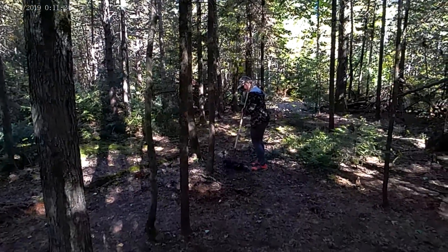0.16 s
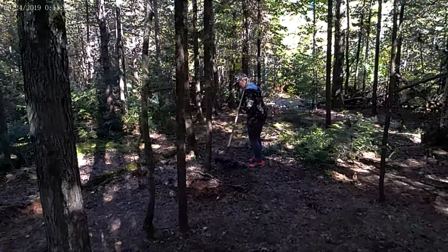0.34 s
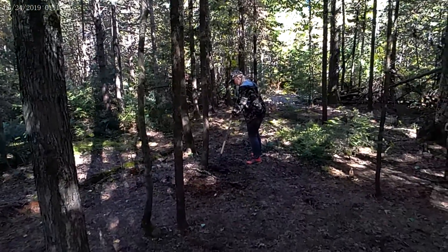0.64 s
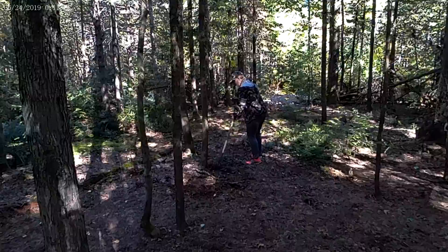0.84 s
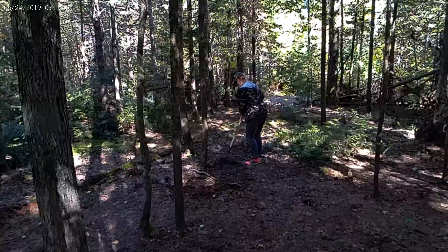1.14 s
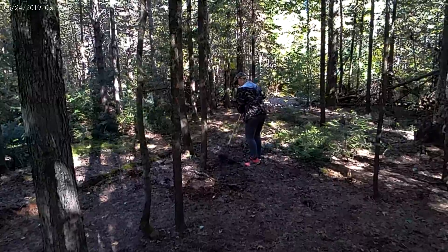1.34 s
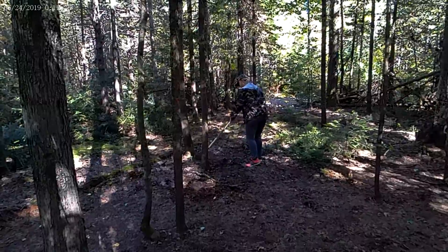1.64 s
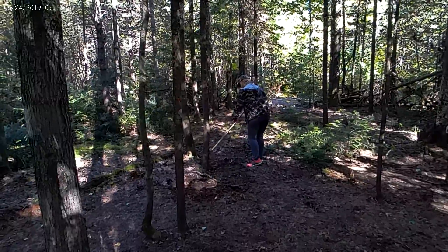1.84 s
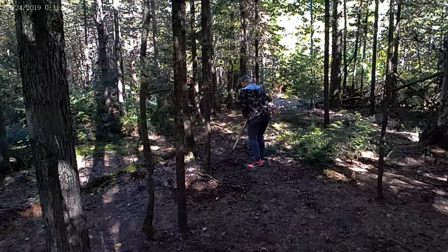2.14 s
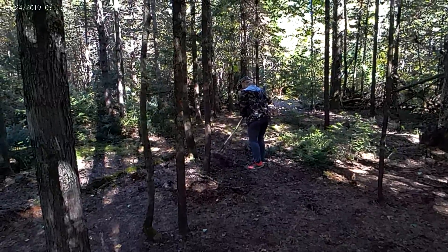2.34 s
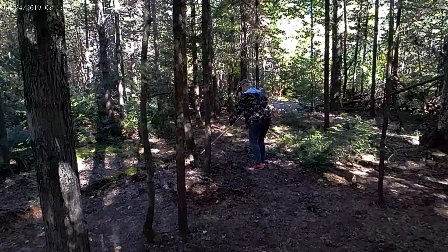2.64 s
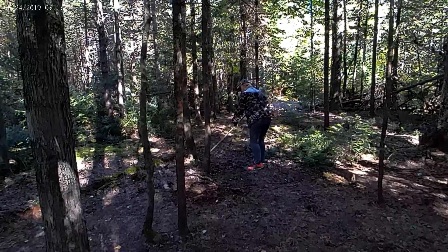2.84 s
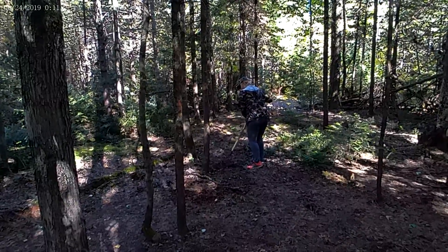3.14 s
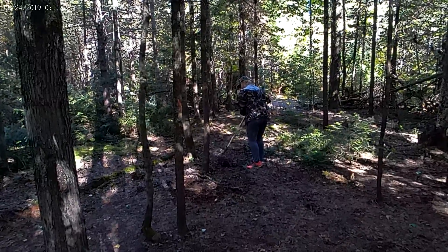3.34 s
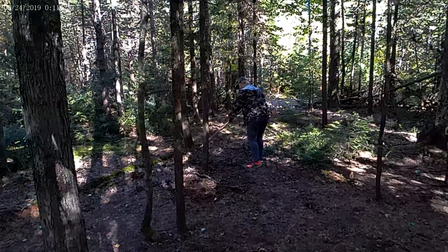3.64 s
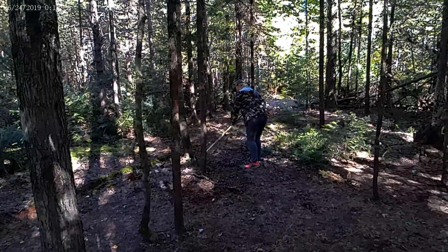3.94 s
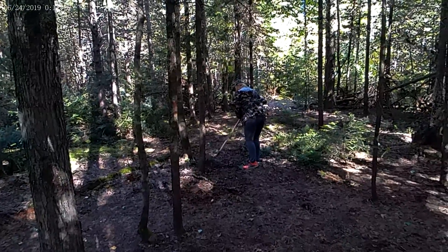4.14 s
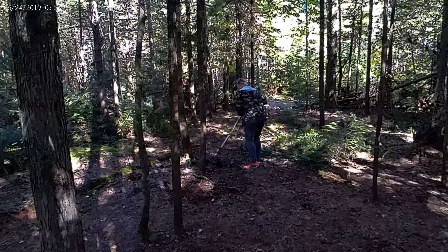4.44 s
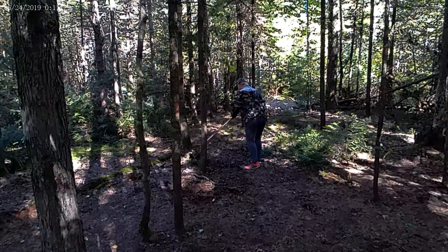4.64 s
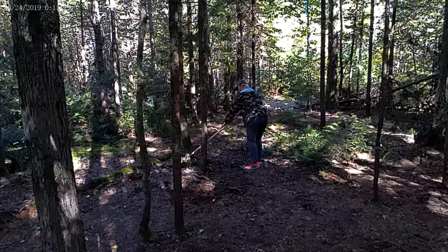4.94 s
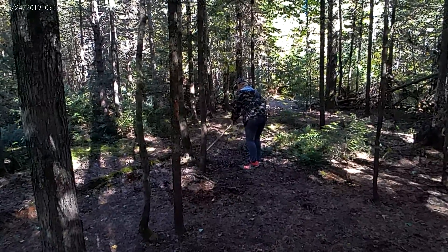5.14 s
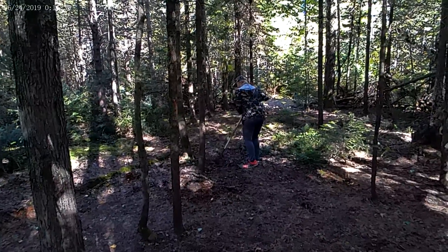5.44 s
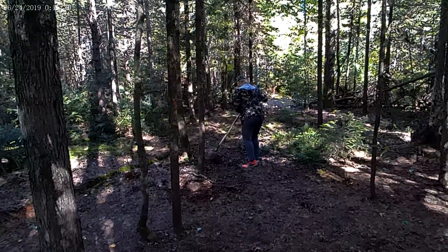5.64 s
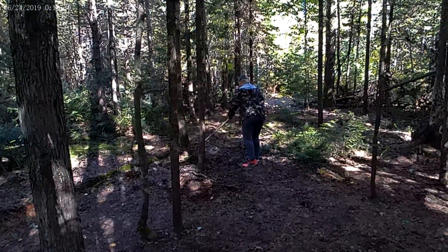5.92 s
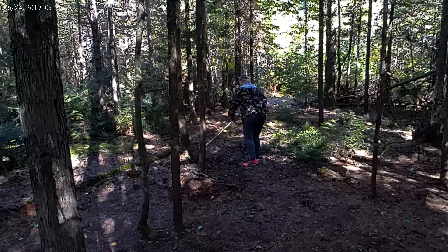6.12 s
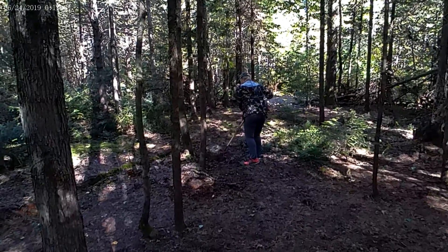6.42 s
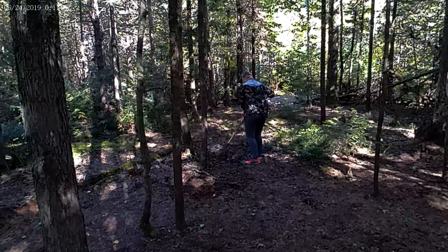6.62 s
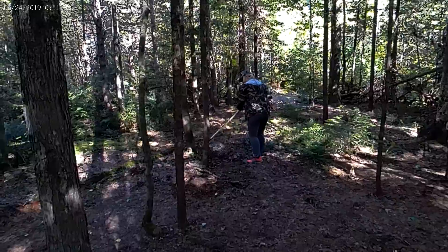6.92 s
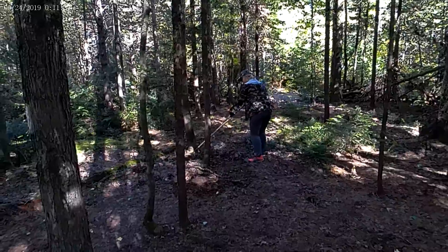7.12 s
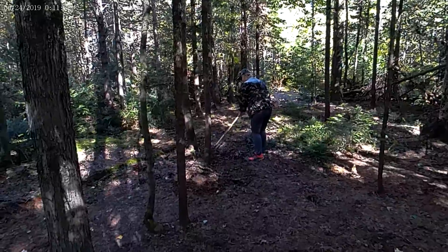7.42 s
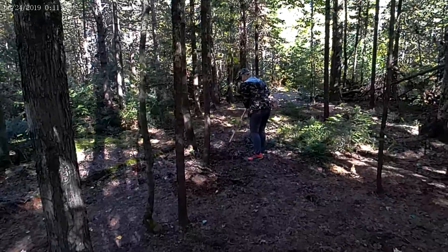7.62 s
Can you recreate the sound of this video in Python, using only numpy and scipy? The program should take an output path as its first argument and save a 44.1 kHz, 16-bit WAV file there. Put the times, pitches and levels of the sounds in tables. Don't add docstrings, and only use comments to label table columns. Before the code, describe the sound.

In a wood, a rake is pulled through dry leaves and soil about once a second, heard from some metres away on a small camera microphone. Each stroke swells from a light brush into dense crackle and gritty scrape, then stops quickly. Twigs snap and the rake head knocks roots now and then. Between strokes litter shuffles softly over constant low rumble and faint hiss.

```python
import sys
import numpy as np
from scipy import signal
from scipy.fft import rfft, irfft, next_fast_len
from scipy.io import wavfile

SR = 44100
rng = np.random.default_rng(int(sys.argv[2]) if len(sys.argv) > 2 else 0)


def generate_wav(sig):
    pcm = np.round(np.clip(np.atleast_2d(sig).T, -1, 1) * 32767).astype(np.int16)
    wavfile.write(sys.argv[1], SR, pcm)


def level_to_linear(level):
    exponent = np.asarray(level, float) / 20
    return 10 ** exponent


N = 342921

# (frequency [Hz], level [dB per Hz])
WOOD_SPECTRUM = [(2, 9), (20, -2), (70, -4), (150, -10), (400, -14.5), (900, -19), (1500, -22),
                 (2200, -27.5), (2800, -27.5), (3300, -34.5), (5000, -37), (7000, -62), (11000, -68)]
# (time [s], peak [dB], pitch [Hz], swell [s])
ROOT_KNOCKS = [(0.6915, -50, 5400, .0025), (0.6932, -42.5, 1390, .0015), (0.7048, -50, 5550, .0025),
               (0.706, -49, 1390, 0.0014), (0.7078, -55.5, 1390, .001), (5.993, -54, 130, 0.0024),
               (7.167, -48, 62, 0.013), (7.245, -51, 70, .006), (2.0302, -40.5, 255, 0.0024),
               (2.029, -45, 185, 0.0055), (3.108, -48, 220, 0.0023), (6.0163, -33.5, 900, 0.0006),
               (6.0172, -45, 330, 0.0014)]
# (time [s], step [dB], recovery [s])
BODY_JOLT = (2.8215, -35.5, .009)
# (time [s], peak [dB], dullness cut-off [Hz], length [s])
TWIG_SNAPS = [(0.69, -44, 6000, 0.003), (0.698, -46, 6000, 0.003), (0.706, -34, 6000, 0.003),
              (0.708, -42, 6000, 0.0028), (0.977, -38, 6000, 0.003), (1.01, -40, 6000, 0.003),
              (1.156, -45, 6000, 0.003), (2.045, -32, 6000, 0.003), (6.015, -38, 2500, 0.003),
              (6.029, -42, 3000, 0.003), (6.039, -42, 2500, 0.003)]
# (frequency [Hz], level [dB per Hz])
LEAF_SPECTRUM = [(1500, -10), (2200, -0.5), (2800, -4.5), (3500, -0.5), (5000, -3), (8000, 1.5),
                 (12000, -1)]
GRIT_SPECTRUM = [(500, -15), (900, 4.5), (1400, 7.5), (1800, -7), (2500, -19)]
SOIL_SPECTRUM = [(70, -9), (200, 3), (500, 3), (900, 0), (1300, -28)]
FRAGMENT_EDGES = [1200, 3200, 4700, 6200, 7000, 9000, 13000]
# (tines bite [s], lead-in drag [s], pull [s], leaf crackle [dB], grit over leaves [dB])
RAKE_STROKES = [
    (-.05, .2, 0.047, -58.5, 4.5),
    (1.0, 0.23, .24, -55, 1),
    (2.02, 0.26, 0.056, -56, 3),
    (2.97, 0.26, 0.21, -60.5, 2),
    (4.07, 0.28, .18, -57.5, 1),
    (5.16, 0.264, 0.29, -60.5, 1.5),
    (6.22, 0.2, 0.29, -60.5, 3.5),
    (7.48, 0.15, 0.25, -60, -2.5),
]
# (time [s], change [dB], length [s], crisp change [dB])
TINE_SURGES = [(0.705, 14, 0.015, -6), (.84, 2, 0.033, -1), (1.02, 3.5, 0.021, -2), (1.07, 0, .02, 0),
               (1.15, 1.5, .04, 1), (1.785, 2.5, .03, -3), (1.85, -3, 0.027, 0), (2.03, 3.5, 0.022, 1.5),
               (2.153, 4, .03, 1), (2.987, 3, 0.047, 0.5), (3.05, 0, .02, 0), (3.11, 5, 0.051, 1),
               (3.93, 0.5, .03, 3.5), (3.993, -4.5, 0.039, 1), (4.09, 1, .03, 1.5), (4.163, -1, 0.022, -1),
               (4.234, 1.5, .025, 0), (5.04, 1, 0.018, -3), (5.2, 2.5, .03, 1.5), (5.33, -2, 0.021, 1.5),
               (5.43, 1.5, .03, 1), (6.022, 12, 0.013, -6), (6.24, 0.8, .03, 0.5), (6.39, 1.5, .04, 0.5),
               (6.47, 1.5, .03, -1), (7.513, 3.5, 0.029, -4), (7.61, -1.5, 0.029, -2),
               (7.69, 2.5, .03, 1.5)]
# (time [s], level [dB], crisp change [dB])
LITTER_SETTLING = [
    (.1, -87, 12),
    (.6, -70.5, -3),
    (1.5, -77, 7),
    (2.5, -71, -3),
    (3.55, -72, -3),
    (4.6, -73, -1),
    (5.65, -69.5, -5),
    (5.9, -75, 1),
    (6.8, -69.5, -3),
    (7.25, -67.5, -8),
]
# (frequency [Hz], width [Hz], lift [dB])
PORT_RESONANCES = [(1043, 73, 1.5), (1450, 470, 8), (3944, 520, 4.5), (5510, 980, 12), (6550, 700, 2),
                   (7740, 380, 3.5), (8640, 580, -3.5), (9990, 990, 5.5)]

PORT_CUT_HZ, CAMERA_CUT_HZ = 10900, 15720
WOOD_DB, HISS_DB, OFFSET = -54.5, -66, -.0085
HOLE_HZ, HOLE_FROM_DB = 11500, -58
TOUCH_DB, TOUCH_S = -70.5, 0.014
LIFT_DB_PER_S = 149
RASP_DB, RASP_SAG_DB = -2, 1.5
CRISP_DB, CRISP_PER_DB = -6, -0.04
GRIT_REST_DB, GRIT_LEAD_DB = 4.5, 1.5


def rms_one(x):
    return x / np.sqrt(np.mean(x ** 2) + 1e-20)


def colour(x, spectrum):
    size = next_fast_len(N)
    hz, level_db = np.transpose(spectrum)
    grid = np.maximum(np.arange(size // 2 + 1) * SR / size, 1)
    gain = level_to_linear(np.interp(np.log(grid), np.log(hz), level_db))
    return irfft(rfft(x, size) * gain, size)[:N]


def drift(rate):
    r = np.exp(-40 * np.pi * rate / SR)
    noise = rng.standard_normal(N // 20 + 4002)
    slow = signal.lfilter([1], [1, -2 * r, r * r], noise)[4000:]
    return np.interp(np.arange(N) / 20, np.arange(len(slow)), rms_one(slow))


def band(x, order, low_hz, high_hz, run=signal.sosfilt):
    return run(signal.butter(order, [low_hz, high_hz], "band", fs=SR, output="sos"), x)


def port(x):
    for hz, width_hz, lift_db in PORT_RESONANCES:
        w, a = 2 * np.pi * hz / SR, level_to_linear(lift_db / 2)
        k = np.sin(w) * width_hz / hz / 2
        middle = -2 * np.cos(w)
        x = signal.lfilter([1 + k * a, middle, 1 - k * a], [1 + k / a, middle, 1 - k / a], x)
    return signal.sosfilt(signal.ellip(6, 1, 50, PORT_CUT_HZ, fs=SR, output="sos"), x)


def grains(per_s, spread_db, clumps):
    sizes = level_to_linear(spread_db * np.minimum(rng.exponential(1, N), 4)) * rng.standard_normal(N)
    return sizes * (rng.random(N) < per_s * clumps / SR)


def wood():
    air = port(colour(rng.standard_normal(N), WOOD_SPECTRUM))
    return level_to_linear(WOOD_DB + 0.49 * drift(0.5) + 0.63 * drift(11.4)) * rms_one(air)


def jolt():
    out, t = np.zeros(N), np.arange(6000) / SR
    s, step_db, recovery = BODY_JOLT
    onset = 1 - np.exp(-t / 3e-4)
    step = onset * (1.5 * np.exp(-t / recovery) - .4 * np.exp(-t / .03))
    out[round(s * SR):][:len(t)] += level_to_linear(step_db) * step
    return out


def knocks():
    out, t = np.zeros(N), np.arange(6000) / SR
    for s, peak_db, hz, swell in ROOT_KNOCKS:
        shape = (t / swell * np.exp(1 - t / swell)) ** 2
        out[round(s * SR):][:len(t)] += level_to_linear(peak_db) * shape * np.sin(2 * np.pi * hz * t)
    return out


def snaps():
    out, t = np.zeros(N), np.arange(1200) / SR
    for s, peak_db, cut_hz, length in TWIG_SNAPS:
        burst = rng.standard_normal(len(t)) * np.exp(-t / length)
        burst = signal.lfilter(*signal.butter(1, cut_hz, fs=SR), burst)
        out[round(s * SR):][:len(t)] += level_to_linear(peak_db - 15) * burst
    return port(out + 1e-18)


def stroke():
    t = np.arange(0, N + 64, 64) / SR
    settle_s, settle_db, settle_crisp_db = np.transpose(LITTER_SETTLING)
    rest = level_to_linear(2 * np.interp(t, settle_s, settle_db))
    power, grit, through = rest, rest * level_to_linear(2 * GRIT_REST_DB), np.zeros(len(t))
    for bite, lead, pull, bite_db, grit_over_db in RAKE_STROKES:
        lift = bite + pull
        effort_db = np.interp(t, [bite - lead - TOUCH_S, bite - lead, bite], [-100, TOUCH_DB, bite_db])
        effort_db = effort_db - LIFT_DB_PER_S * np.maximum(t - lift, 0)
        power = power + level_to_linear(2 * effort_db)
        grit = grit + level_to_linear(2 * (effort_db + grit_over_db + GRIT_LEAD_DB * (t < bite)))
        through = through + np.interp(t, [bite, lift, lift + 0.11, lift + 0.22], [0, 1, 1, 0])
    surge_db, surge_crisp_db = np.zeros(len(t)), np.zeros(len(t))
    for s, change_db, length, crisp_change_db in TINE_SURGES:
        bump = np.exp(-.5 * ((t - s) / length) ** 2)
        surge_db = surge_db + change_db * bump
        surge_crisp_db = surge_crisp_db + crisp_change_db * bump
    leaf_db = 10 * np.log10(power) + surge_db
    rasp_db = RASP_DB - RASP_SAG_DB * through
    crisp_db = CRISP_DB + surge_crisp_db + np.interp(t, settle_s, settle_crisp_db) * rest / power
    crisp_db = crisp_db + CRISP_PER_DB * (leaf_db - TOUCH_DB)
    grit_db = 10 * np.log10(grit) + surge_db
    return [np.interp(np.arange(N) / SR, t, course) for course in (leaf_db, rasp_db, crisp_db, grit_db)]


def soil_drag(leaf_db, catch):
    soil = grains(2500, spread_db=1.25, clumps=level_to_linear(.6 * catch + .7 * drift(18)))
    return level_to_linear(-56.5 + 0.36 * (leaf_db + 52)) * rms_one(port(colour(soil, SOIL_SPECTRUM)))


def grit_scrape(grit_db, catch):
    grit = grains(4000, spread_db=1.5, clumps=level_to_linear(1.1 * catch + 1.3 * drift(40)))
    return level_to_linear(grit_db - 0.6) * rms_one(port(colour(grit, GRIT_SPECTRUM)))


def leaves(leaf_db, rasp_db, crisp_db, catch):
    bands = []
    for low, high in zip(FRAGMENT_EDGES, FRAGMENT_EDGES[1:]):
        crackle = grains(7000, spread_db=1.0, clumps=level_to_linear(1.3 * catch + 1.1 * drift(50)))
        crackle = band(crackle, 2, low, high)
        bands.append(port(colour(crackle, LEAF_SPECTRUM)) * level_to_linear(1.6 * drift(5.6)))
    coarse = rms_one(bands[0] + bands[1])
    rasp = rms_one(bands[2] + bands[3])
    crisp = rms_one(bands[4] + bands[5])
    rasp_share = np.clip(level_to_linear(2 * (rasp_db - 1.1)), .15, .8)
    body = np.sqrt(1 - rasp_share) * coarse + np.sqrt(rasp_share) * rasp
    return level_to_linear(leaf_db + 0.06) * (body + level_to_linear(crisp_db + 0.7) * crisp)


def rake():
    leaf_db, rasp_db, crisp_db, grit_db = stroke()
    catch = drift(14)
    ground = soil_drag(leaf_db, catch) + grit_scrape(grit_db, catch)
    return ground + leaves(leaf_db, rasp_db, crisp_db, catch)


def scene():
    return (wood() + jolt() + knocks() + snaps() + rake())[None]


def band_limit(x):
    return signal.sosfilt(signal.butter(12, 15880, fs=SR, output="sos"), x)


def record(dry):
    leaf_db, rasp_db, crisp_db, grit_db = stroke()
    loudness = level_to_linear(leaf_db + crisp_db - HOLE_FROM_DB)
    hiss_spectrum = [(1000, 0.93), (6000, -0.36), (13500, 0.81), (16000, 0.33)]
    hiss = rms_one(colour(rng.standard_normal(N), hiss_spectrum))
    hiss = hiss * level_to_linear(HISS_DB + 1.4 * loudness + .5 * drift(22))
    narrow = band(hiss, 3, HOLE_HZ - 200, HOLE_HZ + 200, run=signal.sosfiltfilt)
    masked = np.clip(4 * (loudness - .55 + .25 * drift(25)), 0, 1)
    top_cut = [(1, 0), (CAMERA_CUT_HZ, 0), (CAMERA_CUT_HZ + 20, -80)]
    mix = colour(dry[0] + hiss - masked * narrow, top_cut)[None] + OFFSET
    return band_limit(mix)


dry = scene()
out = record(dry)
generate_wav(out)
```